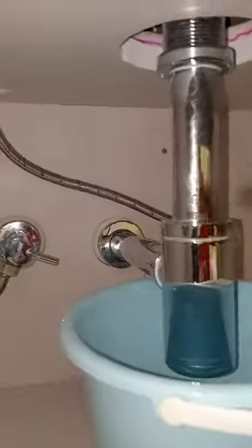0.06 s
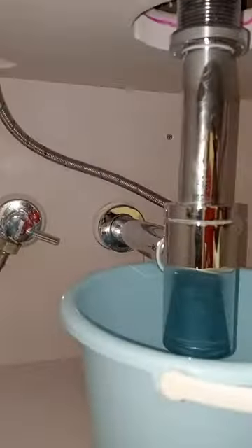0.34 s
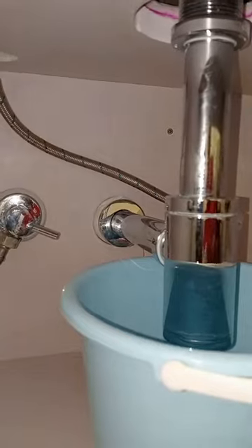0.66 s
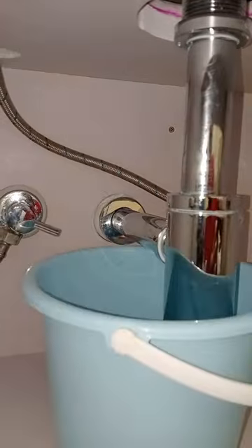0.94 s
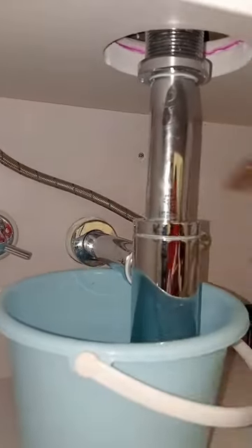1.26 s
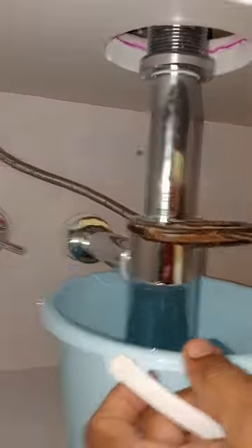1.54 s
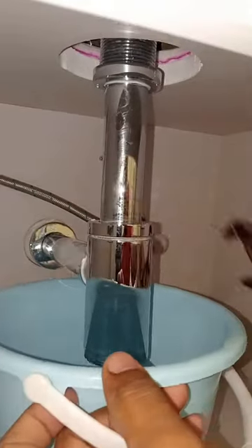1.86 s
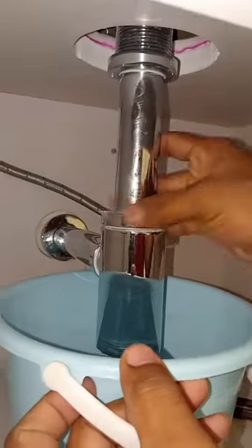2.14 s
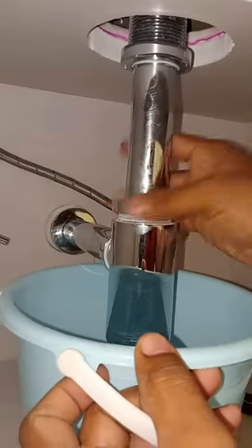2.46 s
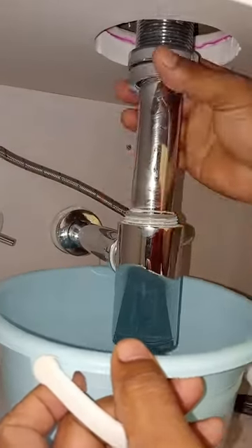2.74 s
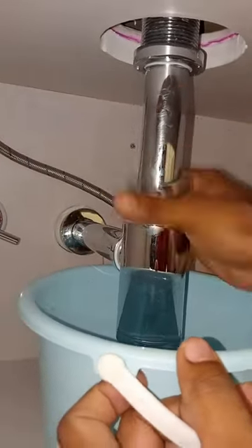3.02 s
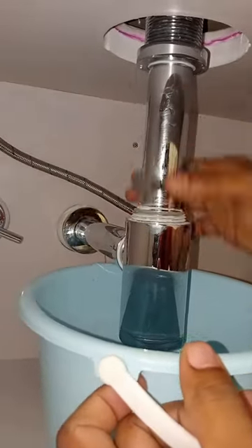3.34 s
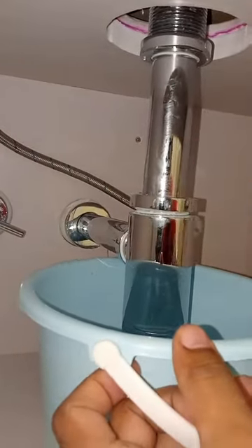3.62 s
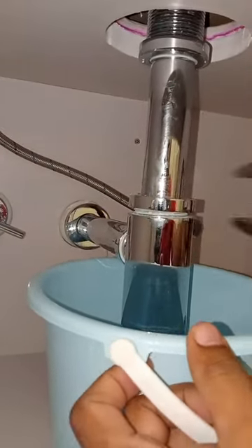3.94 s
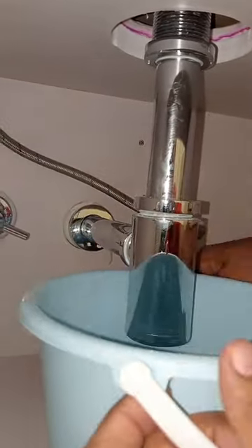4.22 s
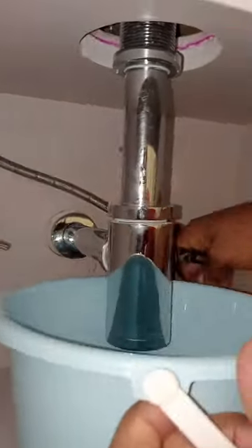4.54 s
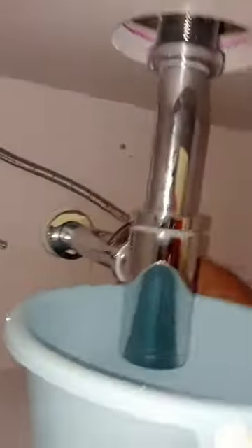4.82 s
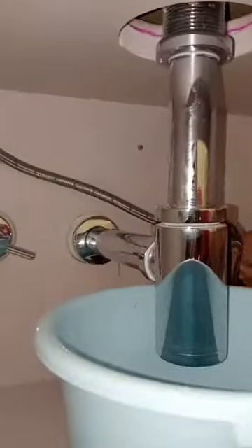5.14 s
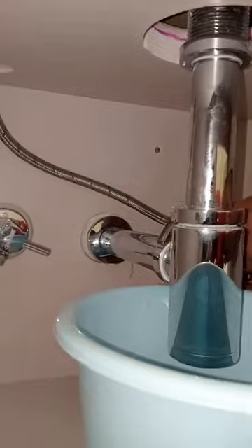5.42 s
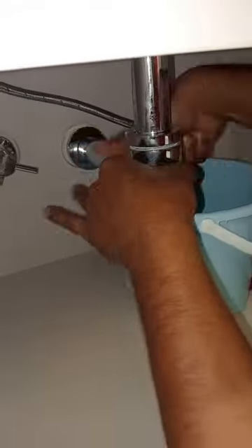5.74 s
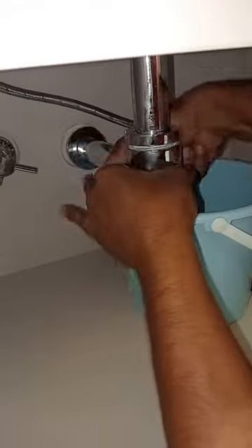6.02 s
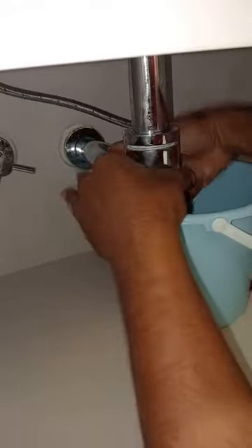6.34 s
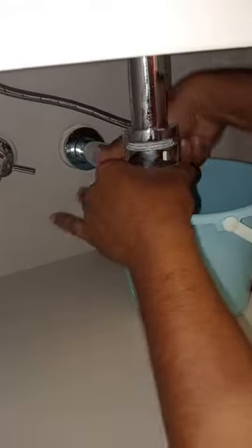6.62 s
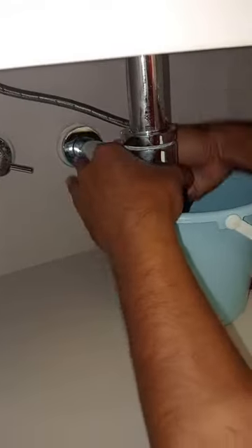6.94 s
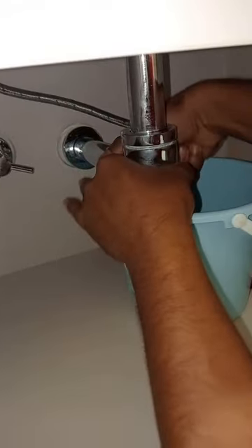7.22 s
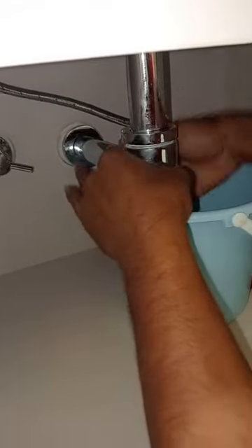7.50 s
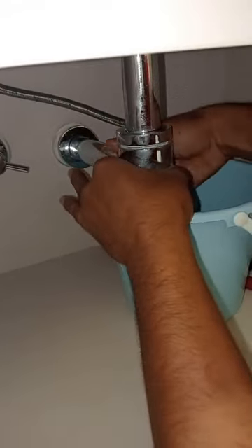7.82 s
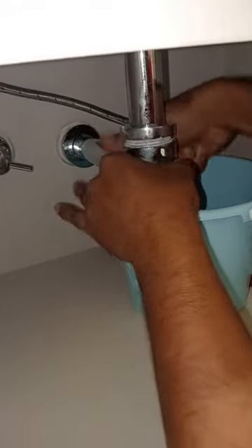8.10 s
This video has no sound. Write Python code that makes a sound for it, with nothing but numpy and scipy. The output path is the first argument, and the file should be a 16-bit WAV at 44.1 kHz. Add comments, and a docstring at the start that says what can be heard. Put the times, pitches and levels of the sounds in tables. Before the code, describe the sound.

A wrench clinks and knocks against a metal sink trap, and a plastic bucket bumps with short thuds. A loosened nut rattles lightly as it is spun along the pipe. More hollow knocks follow, and the wrench jaws grip and slip with scraping clicks. Finally fingers unscrew the trap's cup in quick, muffled, gritty turns. Everything is heard close up in a small, hard-walled room.

```python
"""A wrench knocks, bites and slips on a chromed bottle trap under a sink, its loose jaw clinking. The loosened
nut is spun up the pipe by hand, a plastic bucket bumps below, then fingers unscrew the cup in short gritty
turns. A short gritty swell of noise leads into each blow, which then fades as the parts ring, heard close by in
a small hard-walled room."""
import sys
import numpy as np
from scipy import signal
from scipy.fft import rfft, irfft, next_fast_len
from scipy.io import wavfile
from scipy.ndimage import uniform_filter1d

SR = 44100
rng = np.random.default_rng(int(sys.argv[2]) if len(sys.argv) > 2 else 0)


def generate_wav(signal):
    """Clip the signal to [-1, 1] and save it as 16-bit WAV at the path in sys.argv[1]."""
    frames = np.transpose(np.atleast_2d(signal))
    scaled = np.clip(frames, -1, 1) * 32767
    pcm = np.round(scaled).astype(np.int16)
    wavfile.write(sys.argv[1], SR, pcm)


N = 368808
RING_T_S = np.arange(SR // 4) / SR
SWELL_SAMPLES = SR // 16  # either side of a blow

# modes of the under-sink hollow and the whole trap: f/Hz, level/dB, t60/s
HOLLOW_MODES = [(122, -3, .08), (150, 0, .09)]
TRAP_MODES = [(280, -12, .11), (369, 2.5, .095), (490, -19, .13), (570, -14, .09)]
# radiation of hollow, trap body and surface rasp: f/Hz, level/dB
HOLLOW_SPECTRUM = [(25, -28), (70, -13), (140, 12), (220, -5), (600, -84.5)]
BODY_SPECTRUM = [(90, -38), (270, 4.5), (400, 9.5), (560, 3.5), (800, -2), (1800, -55)]
RASP_SPECTRUM = [(250, -19.5), (800, 0), (1400, -2), (4200, -19), (6500, -35), (15000, -43)]
# knocks on the trap: t/s, level/dB, boom/dB
KNOCKS = [(0.900, -8.5, 9.5), (0.988, -27, 25), (2.075, -10, -14), (2.134, -8.5, -9), (3.698, -13.5, 3.5),
          (3.729, -15, -3), (3.768, -18, -15.5), (4.069, -29.5, 26), (4.308, -9, -11.5), (4.416, -10, -7),
          (4.536, -25.5, 28.5), (5.600, -34.5, 25)]
# drive to hollow, trap, rasp: offset/dB, share of boom
KNOCK_MIX = [(-14.5, 0.81), (-2.5, 0.052), (-18, 0.13)]
def knocks():
    """Blunt blows ring the whole trap low; the hollow under the sink booms."""
    parts = [resonator(HOLLOW_MODES, HOLLOW_SPECTRUM, t60_s=0.04, modes_db=6),
             resonator(TRAP_MODES, BODY_SPECTRUM, t60_s=0.07, modes_db=10),
             resonator([], RASP_SPECTRUM, t60_s=0.065)]
    return contacts(KNOCKS, parts, KNOCK_MIX, rise_s=0.012, fall_s=0.0022, swell_db=-16, blow_s=2e-4)


# trap body modes: f/Hz, level/dB, t60/s
BODY_MODES = [(425, -9, .07), (495, -6, .073), (545, 0, .083)]
# radiation of pipe and wrench steel: f/Hz, level/dB
PIPE_SPECTRUM = [(300, -18), (800, 0.5), (1300, 12), (2600, -13.5), (5500, -35)]
STEEL_SPECTRUM = [(250, -27), (1000, -13), (4300, 3), (7200, -13), (9800, -10), (15500, -26)]
# jaws gripping and slipping: t/s, level/dB, hardness/dB
BITES = [(0.261, -27.5, 16), (0.881, -19.5, 15.5), (1.889, -36, 19), (2.08, -26, 13), (4.526, -17.5, -1),
         (4.539, -26, 8.5), (4.641, -26, 1), (4.706, -22.5, -5.5), (4.729, -21, 4), (4.783, -20.5, 11.5),
         (4.84, -20, 2), (5.015, -23, -6), (5.058, -21.5, 3.5), (5.193, -25.5, 0), (5.277, -21, -2),
         (5.486, -16.5, 9), (5.587, -25, 11.5), (5.602, -20, 7.5)]
# drive to hollow, body, pipe, steel: offset/dB, share of hardness
BITE_MIX = [(-10, 0.38), (1, 0.042), (-11, 0.31), (-23.5, 1)]
def jaw_bites():
    """Toothed jaws grind on the nut and damp its ring; harder bites bring out the steel."""
    parts = [resonator(HOLLOW_MODES, HOLLOW_SPECTRUM, t60_s=0.017, modes_db=12.5),
             resonator(BODY_MODES, BODY_SPECTRUM, t60_s=0.033, modes_db=2.5),
             resonator([], PIPE_SPECTRUM, t60_s=0.047),
             resonator([], STEEL_SPECTRUM, t60_s=0.01)]
    return contacts(BITES, parts, BITE_MIX, rise_s=0.015, fall_s=0.0045, swell_db=-2.5, blow_s=4e-5)


# modes of wrench steel and pipe wall: f/Hz, level/dB, t60/s
STEEL_MODES = [(4225, 1, .055), (4305, 0, .05), (6100, 2, .08)]
WALL_MODES = [(1770, 0, .08), (1914, -1, .09)]
# loose jaw hits: t/s, level/dB
CLINKS = [(0.32, -46), (0.604, -43.5), (0.684, -26), (0.826, -40), (0.886, -22.5), (1.024, -36),
          (1.076, -40), (1.11, -38.5), (1.165, -25), (1.175, -27.5), (1.204, -21), (1.212, -28)]
def jaw_clinks():
    """The wrench's loose jaw chatters against its handle."""
    jaw = resonator(STEEL_MODES + WALL_MODES, STEEL_SPECTRUM, t60_s=0.04, modes_db=-6)
    return contacts(CLINKS, [jaw], [(0, 0)], rise_s=0.012, fall_s=0.0041, swell_db=0.5, blow_s=2e-5)


# hits on the pipe: t/s, level/dB
CLANKS = [(0.523, -25), (2.135, -20), (2.797, -29.5), (3.317, -26)]
def pipe_clanks():
    """Metal meets the pipe squarely; its wall rings in the midrange."""
    wall = resonator(WALL_MODES, RASP_SPECTRUM, t60_s=0.05, modes_db=-7)
    return contacts(CLANKS, [wall], [(0, 0)], rise_s=0.013, fall_s=0.0013, swell_db=-3, blow_s=4e-5)


def squeak(peak_s=0.1378, pitch_hz=1520, sag_hz_per_s=1300, level_db=-24):
    """Sliding metal squeals once, sagging in pitch; overtones and hiss grow with the stroke."""
    rise_s, fall_s = 0.01, 0.017
    t = np.arange(N) / SR - peak_s
    swell = np.exp(-np.abs(t) / np.where(t < 0, rise_s, fall_s))
    shake = noise([(400, 0), (4000, -40)], N)
    hz = pitch_hz - sag_hz_per_s * np.clip(t, -rise_s, 2 * fall_s) + 40 * shake
    phase = 2 * np.pi * np.cumsum(hz) / SR
    overtones = sum(np.sin(k * phase) / (k - 1) for k in range(2, 10))
    friction = amp(-19) * overtones + amp(-28) * noise(STEEL_SPECTRUM, N)
    return amp(level_db) * swell * (1 + 0.35 * shake) * (np.sin(phase) + swell * friction)


# loaded strokes: centre t/s, half length/s, level/dB
GRINDS = [(2.218, 0.061, -40), (5.244, 0.016, -28)]
def grinds():
    """Jaws and thread drag under load, in coarse grains."""
    pressure = sum(amp(db) * stroke(centre_s, half_s) for centre_s, half_s, db in GRINDS)
    body = resonator(BODY_MODES, BODY_SPECTRUM, t60_s=0.02)
    rasp = resonator([], RASP_SPECTRUM, t60_s=0.051)
    return pressure * drag(grit(N, per_s=1300), body() + amp(-9) * rasp())


# light strokes: centre t/s, half length/s, level/dB
SLIDES = [(1.615, 0.029, -39.5), (1.916, 0.068, -54.5), (2.747, 0.014, -51), (2.924, 0.022, -45),
          (3.442, 0.035, -57.5), (4.191, 0.049, -50), (4.29, 0.016, -43.5), (5.227, 0.019, -40.5)]
def slides():
    """Steel skims over chrome without a blow."""
    pressure = sum(amp(db) * stroke(centre_s, half_s) for centre_s, half_s, db in SLIDES)
    skim = resonator([], [(300, -8.5), (3600, -5.5), (7000, -24.5), (15500, -30.5)], t60_s=0.047)
    return pressure * drag(grit(N, per_s=2000), skim())


# modes of pipe, nut and treble scratch: f/Hz, level/dB, t60/s
PIPE_MODES = [(1087, -3, .13), (1270, -3, .09), (1365, 0, .11)]
NUT_MODES = [(5040, 0, .04), (4270, -9, .04), (7250, 14, .07)]
SCRATCH_MODES = [(13620, 0, .03)]
# radiation of nut and scratch: f/Hz, level/dB
NUT_SPECTRUM = [(1200, -19.5), (2900, 15.5), (4300, 16.5), (7000, -10), (12000, -58)]
SCRATCH_SPECTRUM = [(6800, -25), (9200, 4.5), (12000, -8), (15500, -12)]
# nut touching the pipe: t/s, level/dB, hardness/dB
RATTLES = [(1.483, -43, -11), (1.539, -32.5, -0.5), (2.605, -29, -3), (2.645, -27, 1.5), (2.797, -30, 7),
           (3.14, -45, 2), (3.181, -30, 0), (3.263, -35, 0.5), (3.317, -30, 8), (3.545, -33.5, -5),
           (4.643, -29.5, 1.5), (5.51, -26, 5.5), (6.083, -36.5, -3.5), (6.349, -31.5, -8),
           (6.744, -44, -24.5), (6.961, -32.5, -4), (7.527, -42.5, -15.5), (7.85, -41, -8.5),
           (8.045, -36.5, -12.5), (8.243, -42, -9.5)]
# drive to body, pipe, nut, scratch: offset/dB, share of hardness
RATTLE_MIX = [(0, -0.29), (-2, -0.33), (-7, 0.77), (-21.5, 2.5)]
def nut_rattles(spin_start_s=2.272, period_s=0.0845, spin_db=-37.5, hardness_db=-13.5):
    """The free nut rattles on the pipe, brighter when hit harder; flicked, it grazes once a turn."""
    parts = [resonator(BODY_MODES, BODY_SPECTRUM, t60_s=0.076, modes_db=4),
             resonator(PIPE_MODES, PIPE_SPECTRUM, t60_s=0.06),
             resonator(NUT_MODES, NUT_SPECTRUM, t60_s=0.028, modes_db=-7),
             resonator(SCRATCH_MODES, SCRATCH_SPECTRUM, t60_s=0.033, modes_db=-6)]
    grazes = [(spin_start_s + turn * period_s, spin_db, hardness_db) for turn in range(4)]
    return contacts(RATTLES + grazes, parts, RATTLE_MIX,
                    rise_s=0.015, fall_s=0.00085, swell_db=3.5, blow_s=3e-5)


def nut_whirl(centre_s=3.195, half_s=0.038, level_db=-43):
    """Spun around the pipe, the nut sings on one mode."""
    nut = resonator(NUT_MODES[:1], NUT_SPECTRUM, t60_s=0.02, modes_db=9)
    return amp(level_db) * stroke(centre_s, half_s) * drag(grit(N, per_s=650), nut())


# cup radiation: f/Hz, level/dB
CUP_SPECTRUM = [(40, -21), (150, 17.5), (400, 12), (850, -1), (4200, -21.5), (7000, -50.5)]
# thread slips: t/s, level/dB
SLIPS = [(5.776, -36.5), (5.858, -25), (5.886, -32), (5.971, -38), (6.008, -25.5), (6.168, -34.5),
         (6.2, -32.5), (6.258, -24.5), (6.326, -31), (6.429, -33.5), (6.493, -24), (6.59, -27.5),
         (6.672, -23), (6.702, -33.5), (6.772, -36), (6.829, -31), (6.935, -26.5), (7.023, -36.5),
         (7.066, -22), (7.098, -29), (7.129, -22.5), (7.333, -22), (7.403, -34.5), (7.447, -26),
         (7.499, -24.5), (7.563, -30), (7.595, -30), (7.655, -30.5), (7.677, -20), (7.78, -38.5),
         (8.023, -25), (8.12, -28), (8.329, -34)]
# drive to cup, rasp: offset/dB, share (zero)
SLIP_MIX = [(0.5, 0), (-15, 0)]
def cup_turns():
    """The hand-muffled cup sticks and slips in its gritty thread: dry thuds with a rasp."""
    parts = [resonator(HOLLOW_MODES + TRAP_MODES, CUP_SPECTRUM, t60_s=0.03, modes_db=-5),
             resonator(PIPE_MODES, RASP_SPECTRUM, t60_s=0.029, modes_db=-10)]
    return contacts(SLIPS, parts, SLIP_MIX, rise_s=0.014, fall_s=0.008, swell_db=-3, blow_s=6e-5)


# bucket pushed into place: t/s, level/dB, hardness/dB
BUMPS = [(0.186, -40.5, 18.5), (0.291, -24.5, 6), (0.524, -19.5, 11.5), (0.554, -24.5, -11),
         (1.565, -31, -2), (1.605, -30, -13), (1.673, -43.5, 15.5), (1.824, -31.5, -16),
         (2.14, -13.5, -0.5), (3.942, -41, -22.5), (5.32, -33.5, 1)]
# drive to hollow, body, rasp: offset/dB, share of hardness
BUMP_MIX = [(-8.5, 0), (-2, 0.2), (-11.5, 0.67)]
def bucket_bumps():
    """The bucket bumps; soft plastic gives a broad, short thud."""
    parts = [resonator(HOLLOW_MODES, HOLLOW_SPECTRUM, t60_s=0.016, modes_db=32.5),
             resonator(BODY_MODES, BODY_SPECTRUM, t60_s=0.18, modes_db=-2.5),
             resonator([], RASP_SPECTRUM, t60_s=0.025)]
    return contacts(BUMPS, parts, BUMP_MIX, rise_s=0.017, fall_s=0.018, swell_db=-2, blow_s=6.6e-5)


# spells of rubbing: start t/s, end t/s, level/dB
RUBS = [(1.46, 3.58, -56), (4.283, 5.652, -50.5), (5.79, 8.4, -48)]
def finger_rubs(per_s=40, spread_db=4, puff_s=0.0041, fade_s=0.03):
    """Fingers shift on the pipe in small uneven rubs, each a puff of noise."""
    catches = (rng.random(N) < per_s / SR) * amp(spread_db * np.clip(rng.standard_normal(N), -2, 1))
    puff = np.exp(-np.abs(np.arange(-SWELL_SAMPLES, SWELL_SAMPLES)) / (puff_s * SR))
    pressure = unit_rms(signal.fftconvolve(catches, puff, "same")) + 0.3
    t = np.arange(N) / SR
    grip = sum(amp(db) * np.clip(np.minimum(t - start, end - t) / fade_s, 0, 1)
               for start, end, db in RUBS)
    friction = noise(CUP_SPECTRUM, N) + 0.5 * noise(RASP_SPECTRUM, N)
    return grip * unit_rms(pressure) * unit_rms(friction)


# room decay: f/Hz, t60/s
ROOM_DECAY = [(140, 0.35), (450, 0.35), (1500, 0.18), (9000, 0.09)]
def room_echo(sound):
    """Hard walls reflect; the bass lingers longest."""
    hz, t, bands = signal.stft(rng.standard_normal(SR * 3 // 4), SR, nperseg=256)
    decay = amp(-60 * t / log_interp(ROOM_DECAY, hz)[:, None])
    tail = signal.istft(bands * decay, SR, nperseg=256)[1]
    delayed_tail = np.pad(tail / np.linalg.norm(tail), (SR // 150, 0))
    return signal.fftconvolve(sound, delayed_tail)[:N]


# background air: f/Hz, level/dB
AIR_SPECTRUM = [(30, -45.5), (135, 13.5), (208, -9.5), (561, -7), (4090, -33), (9500, -49.5)]
def room_air(level_db=-54):
    """Faint, steady low noise."""
    return amp(level_db) * noise(AIR_SPECTRUM, N)


def contacts(table, parts, mix, rise_s, fall_s, swell_db, blow_s):
    """A short gritty swell of noise rises into each blow, then fades; mix sets each part's level."""
    track = np.zeros(N)
    t = np.arange(-SWELL_SAMPLES, SWELL_SAMPLES) / SR
    envelope = np.exp(np.where(t < 0, -(t / rise_s) ** 2, -t / fall_s))
    blow = (t >= 0) * np.exp(-np.abs(t) / blow_s)  # longer is duller

    def strike(at_s, level_db, colour_db=0):
        swell = envelope * grit(len(t), per_s=3500)
        drive = blow / blow.sum() + amp(swell_db) * swell / np.linalg.norm(swell)
        start = max(round(at_s * SR) - SWELL_SAMPLES, 0)
        for ring, (offset_db, share) in zip(parts, mix):
            sound = signal.fftconvolve(drive, ring())
            peak_rms = np.sqrt(uniform_filter1d(sound ** 2, size=260).max())
            gain = amp(level_db + offset_db + share * colour_db) / peak_rms
            track[start:start + len(sound)] += gain * sound[:max(N - start, 0)]
    for row in table:
        strike(*row)
    return track


def resonator(modes, spectrum, t60_s, modes_db=0):
    """A vibrating part: each call gives a new ring of clear modes over dense ones dying in t60_s."""
    t = RING_T_S
    tones = np.array([amp(db - 60 * t / life_s) * np.cos(2 * np.pi * hz * t) for hz, db, life_s in modes])
    response = minimum_phase(spectrum, len(t))

    def radiate(motion):
        return unit_rms(irfft(rfft(motion) * response, len(t)))

    def ring():
        dense = radiate(rng.standard_normal(len(t)) * amp(-60 * t / t60_s))
        if not modes:
            return dense
        strengths = amp(rng.normal(0, 2, len(modes)))
        return unit_rms(dense + amp(modes_db) * radiate(strengths @ tones))
    return ring


def minimum_phase(spectrum, size):
    """Causal frequency response: nothing sounds before the tap."""
    gain = amp(log_interp(spectrum, np.fft.rfftfreq(size, 1 / SR)))
    cepstrum = irfft(np.log(gain), size)
    cepstrum[1:size // 2] *= 2
    cepstrum[size // 2:] = 0
    return np.exp(rfft(cepstrum))


def stroke(centre_s, half_s, uneven_db=4):
    """A smooth push, made uneven by the surface."""
    unevenness = amp(uneven_db * noise([(40, 0), (500, -78)], N))
    return np.exp(-((np.arange(N) / SR - centre_s) / half_s) ** 2) * unevenness


def drag(catches, ring):
    """Each catch of a sliding surface rings the part; rms 1."""
    return unit_rms(signal.fftconvolve(catches, ring)[:N])


def grit(size, per_s):
    """Sparse clicks of random size and sign; rms 1."""
    return unit_rms(rng.standard_normal(size) * (rng.random(size) < per_s / SR))


def noise(spectrum, size):
    """Coloured noise; rms 1."""
    gain = amp(log_interp(spectrum, np.fft.rfftfreq(size, 1 / SR)))
    return unit_rms(irfft(rfft(rng.standard_normal(size)) * gain, size))


def log_interp(points, hz):
    points_hz, values = np.transpose(points)
    return np.interp(np.log(hz + 1), np.log(points_hz + 1), values)


def unit_rms(x):
    return x / np.sqrt(np.mean(x ** 2) + 1e-20)


def amp(db):
    return 10 ** (np.asarray(db) / 20)


def scene():
    """Tool, trap and bucket with their echo, plus dry finger rubs and air; mono."""
    direct = knocks() + bucket_bumps() + jaw_clinks() + pipe_clanks() + nut_rattles()
    direct += slides() + grinds() + nut_whirl() + squeak() + jaw_bites() + cup_turns()
    echo = amp(-13.5) * room_echo(direct)
    return (direct + echo + finger_rubs() + room_air())[None]


def record(dry):
    """Brick-wall low-pass."""
    cutoff_hz = 15700
    size = next_fast_len(N + SR // 2)
    passband = np.fft.rfftfreq(size, 1 / SR) < cutoff_hz
    return irfft(rfft(dry, size) * passband, size)[..., :N]


dry = scene()
out = record(dry)
generate_wav(out)
```